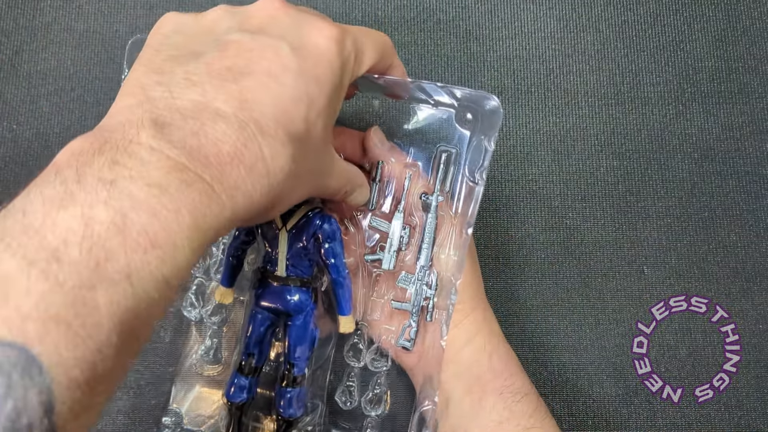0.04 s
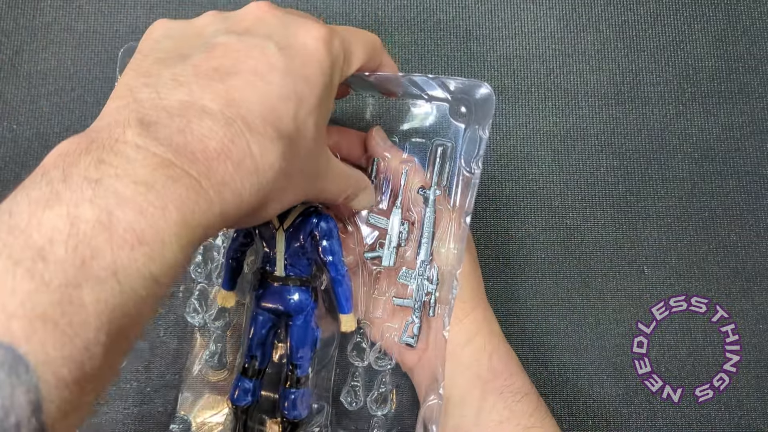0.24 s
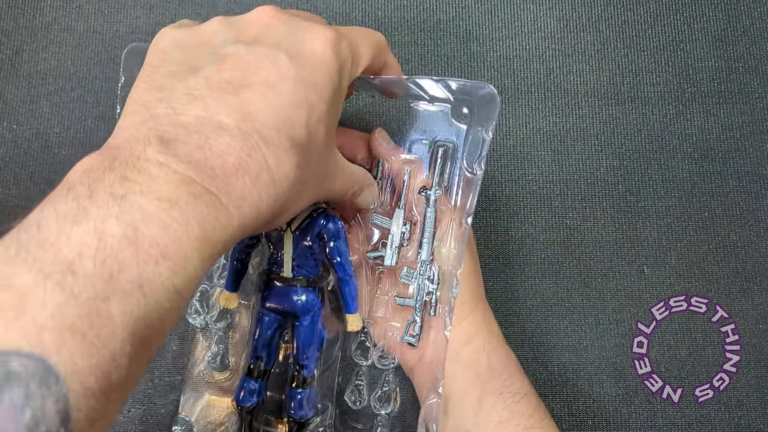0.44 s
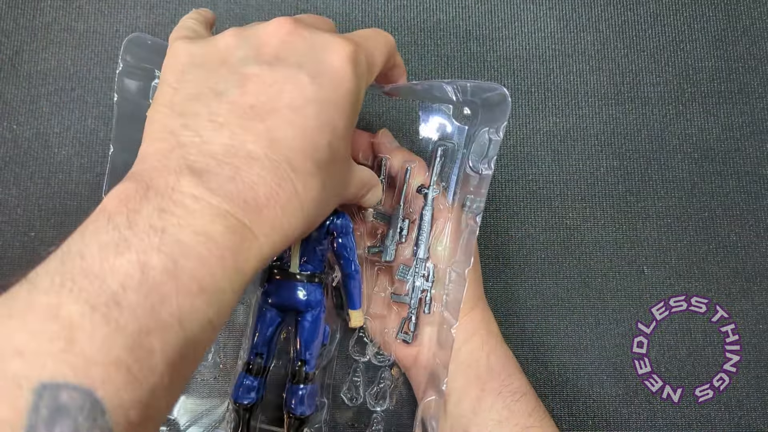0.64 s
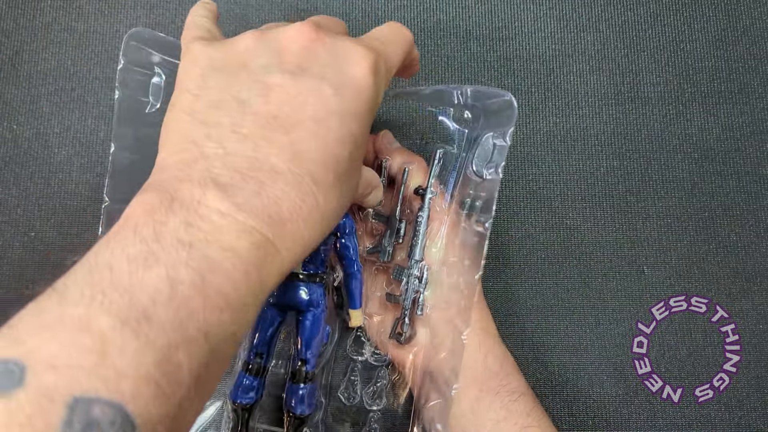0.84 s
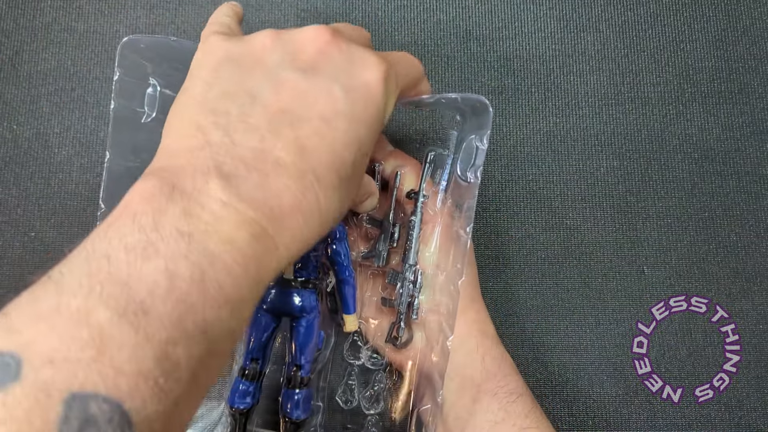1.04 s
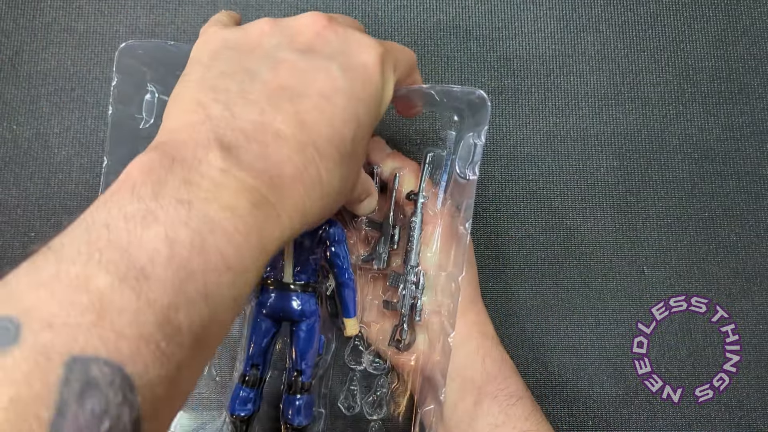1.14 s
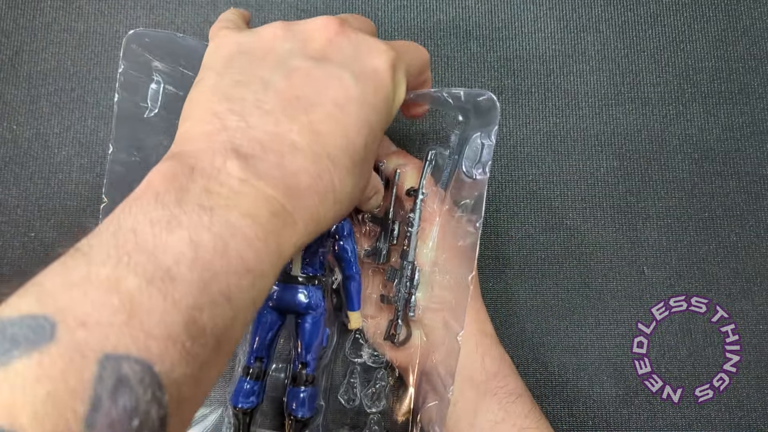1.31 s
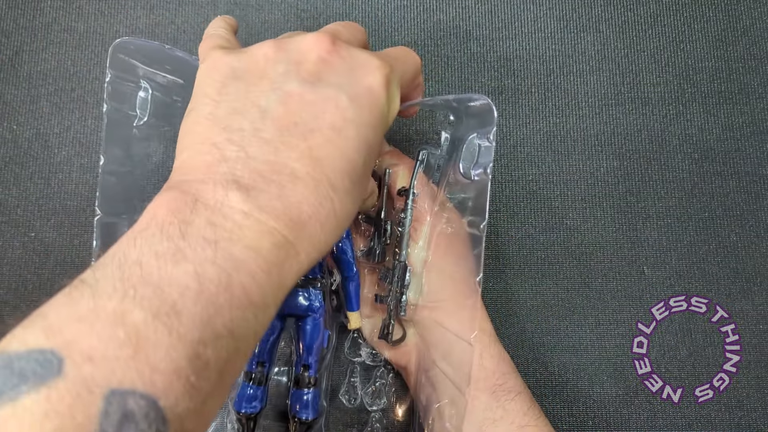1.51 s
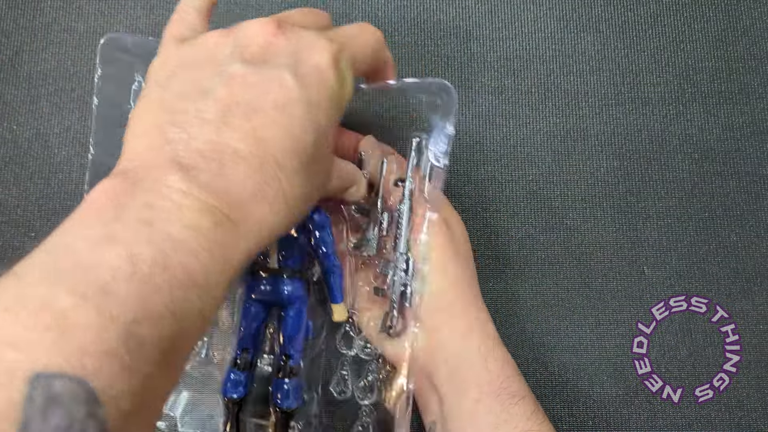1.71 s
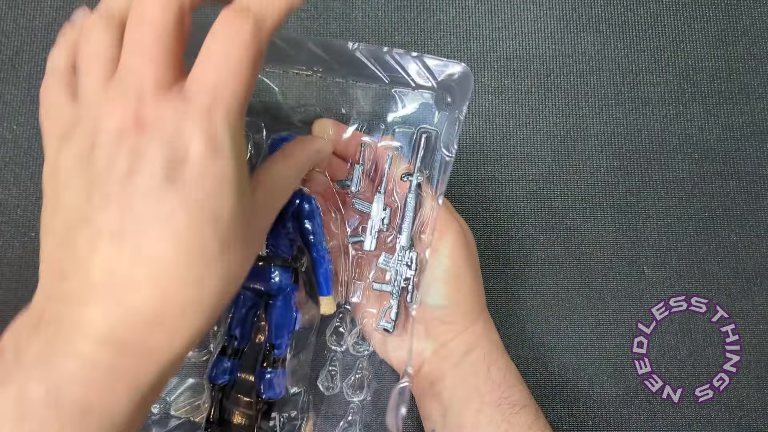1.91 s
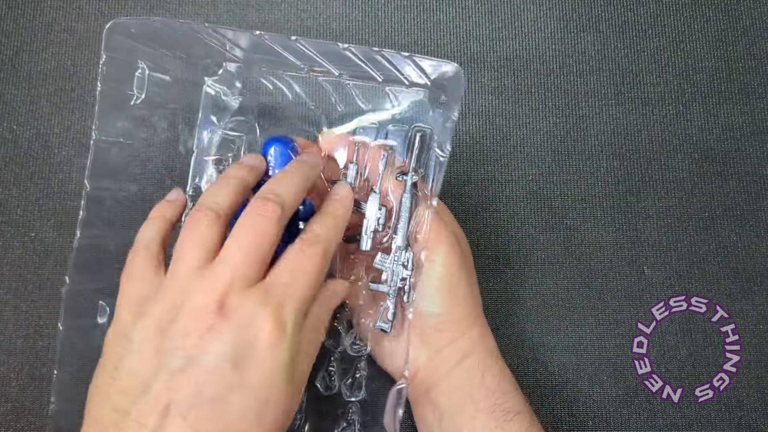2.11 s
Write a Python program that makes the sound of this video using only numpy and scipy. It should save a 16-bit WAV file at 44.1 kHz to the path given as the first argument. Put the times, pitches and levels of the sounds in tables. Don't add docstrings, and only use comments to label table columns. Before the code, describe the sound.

Crinkling thin plastic packaging, very close and dry: quiet ticks at first, a hard hollow pop before one second, busy snapping, another strong buckle around one and a half, then looser crackle dying into faint room tone.

```python
import sys
import numpy as np
from scipy import signal
from scipy.fft import rfft, irfft, next_fast_len
from scipy.io import wavfile

SR = 44100
rng = np.random.default_rng(int(sys.argv[2]) if len(sys.argv) > 2 else 0)


def volts(x):
    e = np.asarray(x, float) / 20
    return 10 ** e


def unload_audio(sound):
    columns = np.transpose(np.atleast_2d(sound))
    steps = np.round(np.clip(columns, -1, 1) * 32767)
    wavfile.write(sys.argv[1], SR, steps.astype(np.int16))


N = 94815
LEFT_LAG_S, LEFT_HIGH_DB = .0001, -1.18


def rms_one(x):
    return x / np.sqrt(np.mean(x ** 2) + 1e-20)


def at_hz(points, hz):
    table_hz, table_db = np.transpose(points)
    return np.interp(np.log(hz), np.log(table_hz), table_db)


def drift(rate_hz):
    r = np.exp(-2 * np.pi * rate_hz / SR)
    noise = rng.standard_normal(N + SR)
    return rms_one(signal.lfilter([1], [1, -2 * r, r * r], noise)[SR:])


def fading(s, gains, decay_s, rise_s=.0001):
    marks = np.zeros(N)
    np.add.at(marks, (np.asarray(s) * SR).astype(int), gains)
    rise = np.exp(-1 / (rise_s * SR))
    swell = signal.lfilter([1 - rise], [1, -rise], marks + 1e-18)
    return signal.lfilter([1], [1, -np.exp(-1 / (decay_s * SR))], swell)


def ring(force, hz, t60):
    r, w = volts(-60 / (t60 * SR)), 2 * np.pi * hz / SR
    level = np.sqrt(2 * (1 - r * r))
    return level * signal.lfilter([0, np.sin(w)], [1, -2 * r * np.cos(w), r * r], force)


def placed(x, lag_s, left_db):
    delay = np.exp(-2j * np.pi * np.fft.rfftfreq(N, 1 / SR) * lag_s)
    left = irfft(rfft(x) * delay, N)
    return np.array([left * volts(left_db), x * volts(-left_db)])


# (time [s], peak level [dB], upper modes [dB])
POPS = [(0.041, -43, 5), (0.045, -34.5, 6.5), (0.067, -46, -14), (0.085, -40.5, 6.5),
        (0.124, -67, -35), (0.175, -43, -12), (0.2, -49, 7), (0.221, -27, -2), (0.244, -19.5, -2.5),
        (0.348, -38.5, -2.5), (0.391, -29.5, -9), (0.457, -25.5, 2.5), (0.5, -34, -7),
        (0.517, -30, 4), (0.541, -28, 2), (0.554, -26.5, -13), (0.611, -20.5, 2.5), (0.679, -34.5, 9),
        (0.708, -28, 4.5), (0.722, -26.5, -13), (0.744, -31, -19), (0.78, -29, 0), (0.827, -32, -12),
        (0.85, -6, -10.5), (0.957, -44, 0), (0.994, -27, -7),
        (1.011, -30, -14), (1.051, -27.5, -17), (1.072, -26.5, -4), (1.111, -25, -4),
             (1.169, -28, -28), (1.241, -24, -2.5), (1.277, -32, -4), (1.291, -19.5, -5.5),
             (1.329, -23, -12), (1.355, -23.5, -2.5), (1.379, -19, -7.5), (1.397, -18, -4), (1.408, -33, 5),
             (1.483, -7, -3.5), (1.495, -12.5, -12), (1.51, -33, 1), (1.624, -51, 17), (1.658, -24.5, -3),
             (1.682, -22, -5), (1.703, -27, -18), (1.713, -26.5, -2), (1.75, -21, -9), (1.789, -32, -14.5),
             (1.801, -21, -15), (1.812, -18.5, -14.5), (1.857, -25, -2.5), (1.873, -19.5, -3),
             (1.95, -36.5, -21.5), (2.036, -40, -13.5)]
# (time [s], peak level [dB], tilt [dB per octave])
PUSHES = [(0.242, -41.5, 4), (0.452, -51, 20.5), (0.609, -46, -9), (0.851, -25, 2), (1.071, -41.5, -8.5),
          (1.124, -38.5, -12), (1.19, -31.5, -6), (1.492, -23, -2), (1.685, -34, -22.5), (1.748, -28, -5),
          (1.874, -33.5, -7)]
# (frequency [Hz], level [dB], t60 [s])
PUSH_MODES = [(147, -10, .12), (194.3, -6.5, 0.12), (317, 2, 0.08), (416.4, 3.5, 0.077)]
HOLLOW_MODES = [(498, -14, 0.088), (612.6, -6.5, 0.059), (722, -8, 0.061), (770, 1, 0.019),
                (865, -6.5, 0.0043), (932.5, -6.5, 0.023), (1057, -10.5, 0.072)]
UPPER_MODES = [(1147, -7.5, 0.061), (1315, 4.5, 0.013), (1549, -1, 0.017), (1860, -4.5, 0.016),
               (1930, -2, 0.0074), (2137, -12, 0.099), (2565, -4, 0.003), (2840, -0.5, 0.0043)]


def tray_body(strain_db):
    pop_burst_s, push_burst_s = 0.0027, 0.012
    pop_s, pop_db, upper_db = np.transpose(POPS)
    pop_db = pop_db - 6.5
    push_s, push_db, tilt_db = np.transpose(PUSHES)
    crackle = volts(strain_db) * grains()
    flips = struck(PUSH_MODES, push_s, push_db - 9, push_burst_s, volts(-25.5) * crackle, tilt_db)
    hollow = struck(HOLLOW_MODES, pop_s, pop_db, pop_burst_s, volts(-4) * crackle)
    near_end, far_end = [
        struck(UPPER_MODES[k::2], pop_s, pop_db + upper_db, pop_burst_s, volts(-5.5) * crackle)
        for k in range(2)]
    body = placed(flips + hollow + near_end, .00008, 0.44)
    return body + placed(far_end, 1.92 * LEFT_LAG_S, LEFT_HIGH_DB)


def struck(modes, s, db, burst_s, stir, tilt_db=0):
    rise_s, tail_s, tail_db, mode_spread_db = 0.0013, 0.013, -18.5, 3
    spread = rng.standard_normal((len(s), len(modes)))
    out = 0
    for k, (hz, level_db, t60) in enumerate(modes):
        gains = volts(db + tilt_db * np.log2(hz / 250) + mode_spread_db * spread[:, k])
        gains = gains * np.sqrt(1 + t60 / burst_s / 7)
        burst = fading(s, gains, burst_s, rise_s)
        tail = volts(tail_db) * fading(s, gains, tail_s)
        force = (burst + tail + stir) * rng.standard_normal(N)
        out = out + volts(level_db) * ring(force, hz, t60)
    low_cut = signal.butter(2, 1.286 * modes[0][0], "high", fs=SR, output="sos")
    return signal.sosfilt(low_cut, out)


# (time [s], peak level [dB], tilt [dB per octave])
SNAPS = [(0.013, -48.5, 14), (0.0407, -31, -5), (0.0683, -31, -7), (0.1017, -35, -4),
         (0.2165, -23.5, -4.5), (0.2421, -16.5, -6), (0.2763, -68, 42), (0.3377, -28, 0.5),
         (0.363, -38.5, 19.5), (0.392, -26.5, -4.5), (0.416, -18, 6), (0.4554, -20.5, -2),
         (0.5066, -30.5, 16.5), (0.542, -8, -4), (0.566, -18.5, -3), (0.592, -21.5, -9.5),
         (0.611, -15.5, -3.5), (0.6798, -11.5, -1.5), (0.7051, -11.5, 2.5), (0.7439, -22, -6),
         (0.7799, -19.5, -5.5), (0.8152, -37.5, -18), (0.848, -21, 3.5), (0.8587, -30, -13.5),
         (0.8889, -16.5, -1.5), (0.9321, -32, 14), (0.9554, -15, -3), (1.0196, -22.5, -7.5),
         (1.059, -28.5, 6),
         (1.0845, -12, 0.5), (1.1678, -28.5, -7.5), (1.184, -26.5, -8.5), (1.2384, -10.5, -1.5),
              (1.2558, -33, 23), (1.2754, -11.5, -3.5), (1.2911, -12.5, 3), (1.2974, -10, 4.5),
              (1.315, -31.5, -22), (1.3293, -18, -2), (1.3348, -17, -1), (1.3493, -14.5, 0),
              (1.363, -13, 0.5), (1.3825, -12, -0.5), (1.404, -13, 4.5), (1.4137, -19.5, 0.5),
              (1.476, -25, -10.5), (1.483, -4.5, -3.5), (1.6218, -25.5, -7.5), (1.633, -30, 5),
              (1.645, -24, -3.5), (1.661, -21, -7), (1.6815, -25, 0.5), (1.741, -29, 5.5),
              (1.7516, -15.5, -3), (1.7654, -29.5, 15), (1.8068, -19.5, 11.5), (1.8142, -27.5, -18.5),
              (1.8565, -30.5, 2), (1.8697, -20.5, -11.5), (2.051, -34.5, -0.5), (2.122, -44, -4)]
# (frequency [Hz], level [dB])
SNAP_COLOUR = [(2000, -7.5), (3200, -4), (5000, 0), (7000, 2.5), (10000, 1), (14000, 1), (16000, -5)]


def creases(crackle_db):
    burst_s, rise_s, snap_db = 0.00084, 0.00094, -3.5
    tail_s, tail_rise_s, tail_db = 0.013, 0.0013, -22.5
    ring_cycles, spread_db, lag_spread_s = 17, 4.5, .00003
    s, db, tilt_db = np.transpose(SNAPS)
    spread = rng.standard_normal((len(s), 24))
    rattle = grains()
    places = np.zeros((5, N))
    for k, hz in enumerate(np.geomspace(2200, 15500, num=24)):
        uneven_db = spread_db * spread[:, k]
        gains = volts(db + snap_db + tilt_db * np.log2(hz / 6000) + uneven_db)
        burst = fading(s, gains, burst_s, rise_s)
        tail = volts(tail_db) * fading(s, gains * volts(-.5 * uneven_db), tail_s, tail_rise_s)
        force = burst + tail * (1.67 + .5 * rattle) + volts(crackle_db) * rattle
        rung = ring(force * rng.standard_normal(N), hz, ring_cycles / hz)
        places[k % 5] += volts(at_hz(SNAP_COLOUR, hz) - 12.5) * rung
    low_cut = signal.butter(2, 1700, "high", fs=SR, output="sos")
    places = signal.sosfilt(low_cut, places)
    return sum(placed(x, LEFT_LAG_S + (k - 2) * lag_spread_s, LEFT_HIGH_DB)
               for k, x in enumerate(places))


def grains():
    per_s, size_db, clump_db, burst_s, rise_s = 360, 2, 5.5, 0.0019, 0.00038
    born = rng.random(N) < per_s * volts(clump_db * drift(25)) / SR
    size = volts(size_db * np.minimum(rng.exponential(1, N), 2.5))
    return rms_one(fading(np.arange(N) / SR, born * size, burst_s, rise_s))


# (time [s], peak level [dB], frequency [Hz], t60 [s])
PINGS = [(.416, -19, 15400, .01), (0.459, -20.5, 1000, 0.02), (.5064, -16, 15600, 0.011),
         (.518, -20, 716, 0.03), (.5423, -6.5, 4590, 0.023), (.61, -13, 759, 0.05),
         (0.705, -27, 13000, .008), (.849, -23.5, 796, 0.11), (.849, -8.5, 563, 0.048),
         (.849, -10, 942, 0.051), (0.851, -24, 141, 0.11), (.9315, -23, 12800, .008), (1.05, -29, 760, .03),
         (1.0859, -11, 8770, 0.0034), (1.193, -31, 199, 0.035), (1.2393, -20, 8900, 0.012),
         (1.275, -15.5, 8800, 0.0086), (1.2983, -4, 14150, 0.014), (1.397, -20, 810, 0.02),
         (1.403, -15.5, 8700, 0.006), (1.407, -13.5, 985, 0.02), (1.4835, -9.5, 6420, 0.02),
         (1.486, -6, 1335, 0.033), (1.49, -14.5, 584, 0.067), (1.49, -13, 758, 0.033),
         (1.492, -19, 344, 0.05), (1.685, -24, 720, .04), (1.717, -10.5, 748, 0.053),
         (1.751, -19, 1520, 0.047), (1.791, -19.5, 770, 0.043), (1.8045, -8, 762, 0.031),
         (1.876, -25.5, 794, 0.052)]


def pings():
    return damped_tones(PINGS)


# (time [s], peak level [dB], frequency [Hz], t60 [s])
THUMPS = [
    (.862, -39, 70, .35),
    (1.09, -48, 60, .2),
    (1.14, -52, 150, .1),
    (1.41, -47, 48, .2),
    (1.5, -38, 55, .3),
    (1.56, -43, 98, .15),
    (1.92, -43, 119, 0.13),
    (1.98, -50, 55, 0.16),
]


def thumps():
    return damped_tones(THUMPS)


def damped_tones(events):
    rise_cycles, lag_s, pan_db_per_octave = 0.49, .0001, -0.5
    out, t = np.zeros((2, N + SR)), np.arange(SR // 2) / SR
    age = np.maximum(t - np.array([[lag_s], [0]]), 0)
    for s, db, hz, t60 in events:
        left_db = pan_db_per_octave * np.log2(hz / 1000)
        envelope = volts(db - 60 * age / t60) * (1 - np.exp(-age * hz / rise_cycles))
        tone = envelope * np.sin(2 * np.pi * hz * age)
        i = int(s * SR)
        out[:, i:i + len(t)] += tone * volts(np.array([[left_db], [-left_db]]))
    return out[:, :N]


def handling(strain_db):
    centre_hz, level_db, follows_strain = 55, -66.5, 0.15
    band = signal.butter(2, [centre_hz * 0.23, centre_hz * 2.7], "band", fs=SR, output="sos")
    rumble = rms_one(signal.sosfilt(band, rng.standard_normal(N + SR))[SR:])
    grip_db = follows_strain * (strain_db - strain_db.mean())
    growth_db = 8 * np.arange(N) / N
    return volts(level_db + grip_db + growth_db + 1.5 * drift(5.1)) * rumble


def room(x):
    t60_s, wall_cut_hz = 0.13, 63000
    size = next_fast_len(N + SR)
    turn = -2j * np.pi * np.fft.rfftfreq(size, 1 / SR)
    out = np.zeros((2, len(turn)), complex)
    for k, lag_s in enumerate(rng.uniform(.006, .03, 16)):
        wall = 1 / (1 - turn / (2 * np.pi * wall_cut_hz))
        loop = volts(-60 * lag_s / t60_s) * np.exp(turn * lag_s) * wall
        out[k % 2] += loop / (1 - loop) * (-1) ** (k // 2)
    return irfft(out * rfft(x, size), size)[:, :N]


# (frequency [Hz], level [dB per Hz])
FLOOR = [(24, -39), (40, -4.5), (200, -18.5), (751, -2), (5180, -30), (7730, -24), (16000, -30)]


def room_tone():
    shape = volts(at_hz(FLOOR, np.fft.rfftfreq(N, 1 / SR) + 1))
    mid, side = irfft(rfft(rng.standard_normal((2, N))) * shape, N)
    return volts(-66) * rms_one(mid + 0.88 * side * [[1], [-1]])


# (time [s], crackle level [dB])
STRAIN = [(0, -53), (0.069, -36.5), (0.15, -63.5), (0.238, -47.5), (0.318, -57.5), (.5, -34),
          (0.701, -46.5), (0.829, -47), (.99, -36.5), (1.15, -49), (1.3, -43.5), (1.42, -33.5),
          (1.602, -42.5), (1.699, -30.5), (1.868, -38), (1.93, -53.5), (2.03, -75.5), (2.15, -61.5)]


def scene():
    strain_db = np.interp(np.arange(N) / SR, *np.transpose(STRAIN))
    tray = tray_body(strain_db) + creases(strain_db - 8.5)
    close = tray + pings() + thumps()
    return close + handling(strain_db) + volts(-15) * room(tray) + room_tone()


# (from [s], to [s])
STARVED = [(.33, .413), (.49, .505), (.688, .704), (.785, .8), (.862, .886), (.895, .928), (1.062, 1.082),
           (1.246, 1.272), (1.464, 1.48), (1.625, 1.658), (1.753, 1.8)]


def starved(x):
    share, drop_db, from_hz = .33, -30, 3400
    hz, t, z = signal.stft(x, SR, nperseg=256)
    inside = np.any([(t > a) & (t < b) for a, b in STARVED], axis=0)
    luck = rng.random((len(hz) // 4 + 1, len(t) // 2 + 1))
    luck = luck.repeat(4, axis=0).repeat(2, axis=1)[:len(hz), :len(t)]
    lost = (luck < share) & inside & (hz[:, None] > from_hz)
    thinned = z * np.where(lost, volts(drop_db), 1)
    return signal.istft(thinned, SR, nperseg=256)[1][:, :N]


def band_limit(x):
    return signal.sosfilt(signal.butter(12, 16820, fs=SR, output="sos"), x)


def record(dry):
    rumble_cut = signal.butter(3, 42, "high", fs=SR, output="sos")
    top_cut = signal.cheby1(10, .5, 15850, fs=SR, output="sos")
    x = signal.sosfilt(rumble_cut, np.tanh(dry))
    x = signal.sosfilt(top_cut, x)
    mix = np.clip(starved(x), -1, 1)
    return band_limit(mix)


dry = scene()
out = record(dry)
unload_audio(out)
```